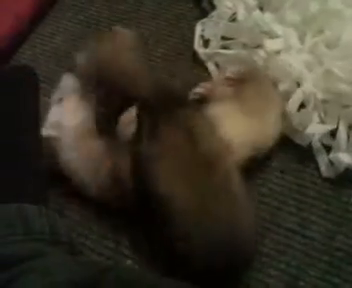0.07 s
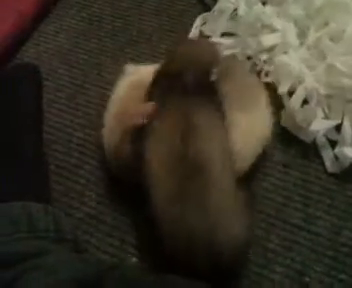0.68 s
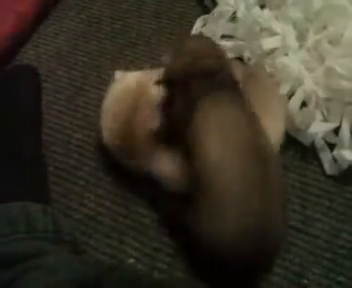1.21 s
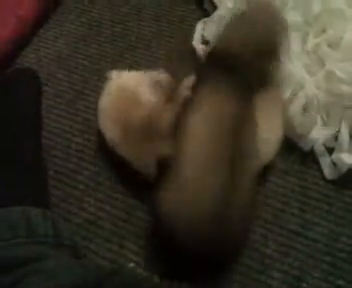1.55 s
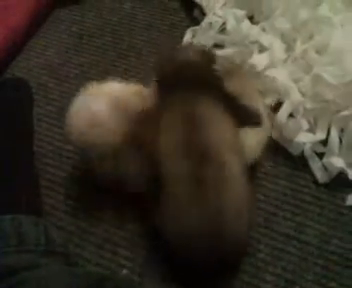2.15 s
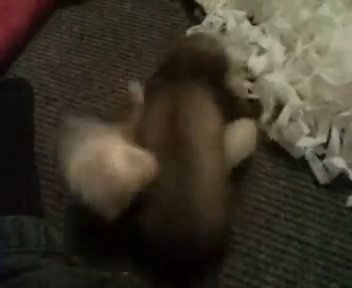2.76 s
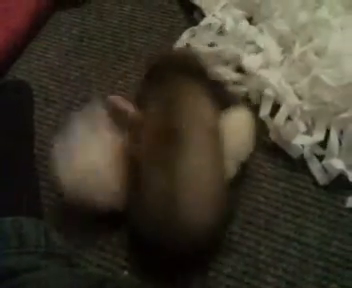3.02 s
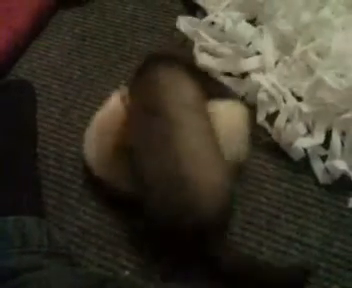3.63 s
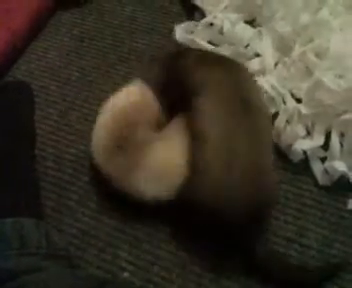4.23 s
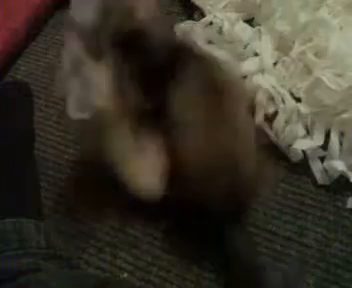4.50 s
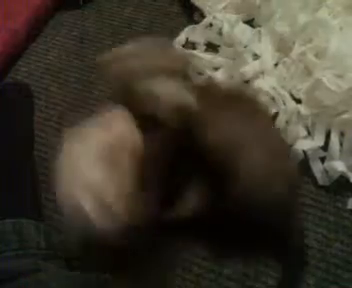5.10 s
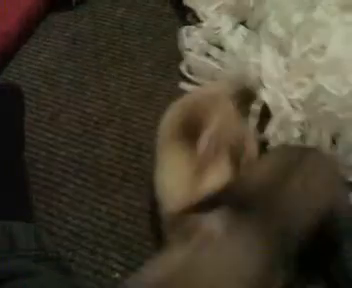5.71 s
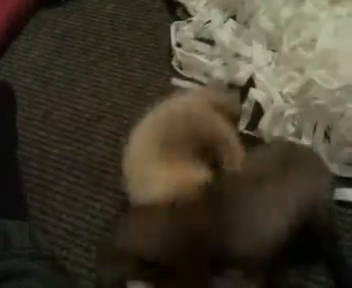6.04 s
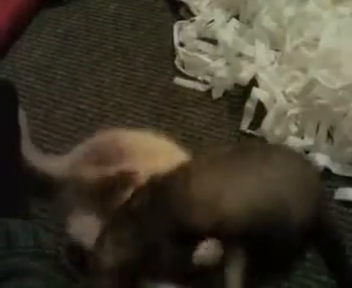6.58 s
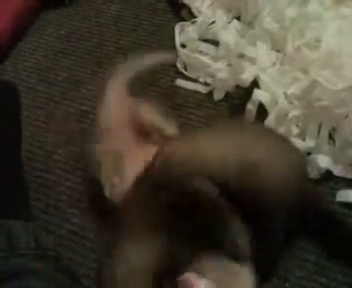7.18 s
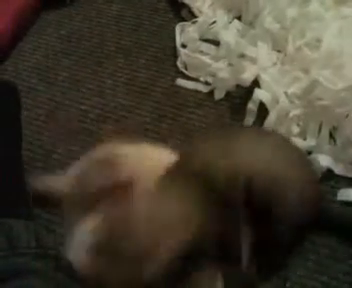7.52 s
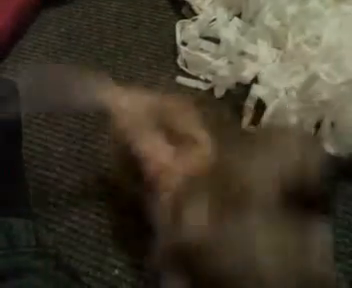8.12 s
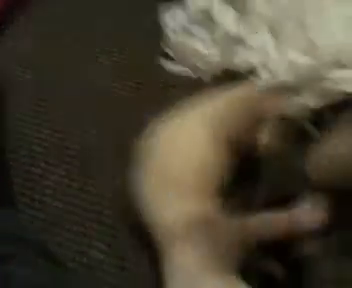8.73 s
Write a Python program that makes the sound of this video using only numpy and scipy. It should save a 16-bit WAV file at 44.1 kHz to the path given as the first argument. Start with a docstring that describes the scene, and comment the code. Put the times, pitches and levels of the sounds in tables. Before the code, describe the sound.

A low motor hum slowly swells and fades throughout in a small, quiet room, with soft hiss and a faint, thin whine from the close microphone. Ferrets play on the carpet: a tiny squeak and faint crinkles of shredded paper come just before 1 second, then soft fur rubs until about 1.6. One ferret gives short, hoarse clucks at about 2.2, 2.8, 3.1 and 3.7 seconds, and a body lands with a dull floorboard thud at 2.7. Faint squeaks follow around 4 seconds, then light claw scratches and paper rustle near 4.5. The loudest thud comes at 5 seconds. Paper stirs at 5.7, a claw catches the carpet near 6, and another thud lands at 6.4. Light scuffs and tiny squeaks continue between 7 and 8 seconds. Two sharper bumps arrive at 8.3 and 8.5, ending with a small scratch and paper crackle.

```python
"""A low motor hum and a soft hiss fill a small, quiet room; then ferrets start to wrestle on the carpet.
Fur rubs and claws scratch the pile, shredded paper stirs, and there are a few tiny squeaks.
One ferret gives short, hoarse clucks as pulses of its voice ring its throat and mouth.
Bodies land and make the floorboards thud. All along, the hum slowly swells and fades,
and a small camera close by adds the hiss and a thin whine."""
import sys
import numpy as np
from scipy import signal
from scipy.fft import rfft, irfft, next_fast_len
from scipy.io import wavfile
from scipy.ndimage import uniform_filter1d, map_coordinates

SR = 44100
rng = np.random.default_rng(int(sys.argv[2]) if len(sys.argv) > 2 else 0)


def pcm_store(signal):
    """Save signal as 16-bit PCM."""
    levels = np.round(np.clip(np.atleast_2d(signal), -1, 1) * 32767)
    wavfile.write(sys.argv[1], SR, levels.astype(np.int16).T)


N = 385875


def amp(db):
    """Turn decibels into a number to multiply by."""
    return 10 ** (np.asarray(db) / 20)


def unit(x):
    """Scale a sound to an average (rms) strength of 1."""
    return x / np.sqrt(np.mean(x ** 2) + 1e-20)


def clock():
    """The time of every sample, in seconds."""
    return np.arange(N) / SR


def along(points, hz):
    """Read between the rows of a (pitch_hz, value) table, on a musical (log) scale."""
    pitches, values = np.transpose(points)
    return np.interp(np.log(hz + 1), np.log(pitches + 1), values)


def wobble(per_s):
    """A smooth curve through per_s random points a second."""
    return map_coordinates(rng.standard_normal(int(N * per_s / SR) + 4), [clock() * per_s])


def filtered(x, response):
    """Turn each frequency up or down by response(hz)."""
    size = next_fast_len(len(x) + SR // 4)
    return irfft(rfft(x, size) * response(np.fft.rfftfreq(size, 1 / SR)), size)[:len(x)]


def coloured(x, spectrum):
    """Shape a sound's tone with a (pitch_hz, level_db) table, at strength 1."""
    return unit(filtered(x, lambda hz: amp(along(spectrum, hz))))


def fibres(spectrum, spiky_db):
    """Countless tiny snaps of uneven size."""
    return coloured(rng.standard_normal(N) * amp(spiky_db * rng.standard_normal(N)), spectrum)


def stroke(middle_s, length_s):
    """A smooth swell that peaks at middle_s."""
    return np.exp(-2 * np.minimum(((clock() - middle_s) / length_s) ** 2, 20))


def blend(a, b, share):
    """Mix by power: share of b, the rest a."""
    share = np.clip(share, 0, 1)
    return np.sqrt(1 - share) * a + np.sqrt(share) * b


def air_and_hiss(air_db=-64.2, hiss_db=-66.7, unrest_db=.8, drift_db=.5):
    """The room's dull, gently drifting rush and the camera's even hiss."""
    # tone of the quiet room: pitch_hz, level_db
    air_tone = [(20, -10), (55, -.5), (75, -7), (130, -9), (200, -18), (270, -16), (340, -10), (480, -16),
                (800, -21), (1500, -17.3), (2200, -29), (4000, -53.5)]
    # tone of the camera's hiss: pitch_hz, level_db
    hiss_tone = [(500, -6), (2100, 0), (2600, 1), (3200, 0), (3800, -5), (4500, -1.5), (5000, -2),
                 (5600, -6), (6200, -5.5), (6700, -6), (7200, -9.5), (7600, -19.5)]
    air_level = amp(air_db + unrest_db * wobble(15) + drift_db * wobble(1.2))
    air = air_level * coloured(rng.standard_normal(N), air_tone)
    return air + amp(hiss_db) * coloured(rng.standard_normal(N), hiss_tone)


def camera_whine(tick_hz=292.95, stray_hz=2460, stray_db=-78, smear=0.0687):
    """The electronics make fast, even, smeared ticks that merge into a whine, beside one stray tone."""
    # overtones of the ticking: multiple of tick_hz, level_db
    overtones = [(9, -73), (10, -80), (12, -79.5), (13, -84), (14, -82.5), (15, -75.5), (16, -79),
                 (17, -74.5), (18, -76), (20, -78), (21, -83), (23, -80.5), (24, -94), (25, -89.5)]
    t = clock()
    ticks = sum(amp(db) * np.cos(2 * np.pi * round(k) * tick_hz * t - smear * k * k)
                for k, db in overtones)
    return np.sqrt(2) * (ticks + amp(stray_db) * np.sin(2 * np.pi * stray_hz * t))


def motor_hum(motor_hz=98.475, mains_hz=100.175, motor_db=-63.5, mains_db=-68, unrest_db=1):
    """A distant motor runs just behind the mains power, so their two tones swell and fade together."""
    t = clock() - .083  # the first swell peaks near this time
    # motor_hz is twice the shaft's speed; mains_hz is twice the power's frequency
    phase = 2 * np.pi * motor_hz * t + .12 * wobble(1.5)
    motor = amp(motor_db + unrest_db * wobble(3.4)) * np.sin(phase)
    shaft_overtones = amp(-76) * np.sin(2 * phase) + amp(-79) * np.sin(5 / 2 * phase)
    mains = amp(mains_db) * np.sin(2 * np.pi * mains_hz * t)
    return np.sqrt(2) * (motor + shaft_overtones + mains)


def room(x, echo_db=-14, ring_db=-3, ring_delay_s=.023):
    """The walls add a short wash of echoes, and the furniture rings a moment later."""
    # how long the wall echoes last: pitch_hz, fade_s (time to drop 60 dB)
    walls = [(150, 0.5), (700, .25), (1100, 0.43), (3000, 0.17), (7000, 0.0065)]
    # notes the furniture rings at: pitch_hz, width_hz, level_db
    furniture = [(362, 23, -3), (700, 68, -17.5), (910, 52, -7.5), (1026, 9.2, 2.5), (1094, 22, -1),
                 (1235, 80, 5.5), (1746, 25, 3.5)]
    hz, t, noise = signal.stft(rng.standard_normal(SR // 2), SR, nperseg=256)
    tail = signal.istft(noise * amp(-60 * t / along(walls, hz)[:, None]), SR, nperseg=256)[1]
    echoes = signal.fftconvolve(x, np.pad(tail, (SR // 200, 0)) / np.linalg.norm(tail))[:N]
    rings = lambda f: sum(amp(db) * 1j * f * width / (pitch * pitch - f * f + 1j * f * width)
                          for pitch, width, db in furniture)
    ringing = filtered(x, lambda f: rings(f) * np.exp(-2j * np.pi * f * ring_delay_s))
    return x + amp(echo_db) * echoes + amp(ring_db) * ringing


def squeaks_and_tick(waver=0.012, flutter_db=2):
    """Faint, thin tones that flutter a little in pitch and strength."""
    # tiny squeaks and whimpers, and one high, thin tick of paper: middle_s, level_db, length_s, pitch_hz
    notes = [(0.617, -64.5, 0.04, 2460), (.774, -73, 0.025, 3140), (1.992, -68.5, .022, 3140),
             (3.957, -69, 0.059, 2440), (4.093, -74, .032, 3200), (4.106, -71.5, 0.045, 2434),
             (2.9, -65.5, .012, 6480), (6.06, -67, 0.027, 3400), (7.598, -66, 0.0097, 790),
             (7.608, -69, 0.036, 2430), (7.73, -70, 0.037, 2470), (7.75, -74.5, 0.025, 3420),
             (7.768, -71, 0.021, 780)]
    bent_time = np.cumsum(1 + waver * wobble(200)) / SR
    flat_swell = lambda s, length: np.minimum(2 * stroke(s, length), 1)
    tones = sum(amp(db) * flat_swell(s, length) * np.sqrt(2) * np.sin(2 * np.pi * hz * bent_time)
                for s, db, length, hz in notes)
    return tones * amp(flutter_db * wobble(70))


def paper_crinkles():
    """Strips of shredded paper crackle when nudged."""
    # nudges to the paper: middle_s, level_db, length_s
    nudges = [(.72, -73, .04), (.857, -69.5, .064), (1.35, -77, .052), (1.55, -74, .08),
              (2.896, -67, .0094), (4.53, -65, .08), (4.68, -67, .13), (5.68, -62.5, .18), (6.05, -64, .08),
              (8.67, -62.5, .22)]
    # tone of the crackle: pitch_hz, level_db
    paper_tone = [(1000, -4.5), (2500, -4), (3300, -7), (4000, -11), (5600, -9.5), (6500, -13.5),
                  (7000, -10.5), (7500, -41)]
    swells = sum(amp(db) * stroke(s, length) for s, db, length in nudges)
    return swells * fibres(paper_tone, spiky_db=12.0)


def carpet_scuffs(catch_db=3, catches_per_s=140):
    """Fur rubs the pile dully and claws scratch it, catching and slipping."""
    # paws and sides brushing the carpet: middle_s, level_db, length_s, claw_share (0-1)
    brushes = [(1.04, -64, .07, .01), (1.117, -62, .034, .01), (1.172, -62, .03, 0), (1.493, -61, .035, .1),
               (1.57, -58, .047, .04), (4.294, -69, .033, 0), (4.46, -69, .04, .5), (4.512, -62, .04, .55),
               (5.073, -59.5, .035, .6), (6.04, -59.5, .06, .2), (6.068, -55.5, .014, .1),
               (7.148, -59, .024, .08), (7.275, -58.5, .045, .25), (6.43, -59.5, .036, .55),
               (7.594, -61.5, .038, .6), (7.717, -67, .11, .7), (8.348, -54, .015, .1),
               (8.625, -59.5, .04, .15), (8.685, -64, .07, .6)]
    # tone of the soft rub: pitch_hz, level_db
    rub_tone = [(100, -5.5), (220, -5.5), (340, -0.5), (520, -10), (800, -23.5), (1400, -19), (3000, -13.5),
                (7000, -63)]
    # tone of the scratch: pitch_hz, level_db
    scratch_tone = [(200, -12), (340, -4), (480, -2), (620, -5), (800, 0), (1000, -3), (1350, 1.5),
                    (1900, -7), (2700, -17), (3300, -16), (4200, -24), (7000, -28)]
    rub, scratch = fibres(rub_tone, spiky_db=3.5), fibres(scratch_tone, spiky_db=4.0)
    slips = unit(amp(catch_db * wobble(catches_per_s)))
    return slips * sum(amp(db) * stroke(s, length) * blend(rub, scratch, claw_share)
                       for s, db, length, claw_share in brushes)


def claw_snags(fade_s=0.03, width_octaves=.45):
    """A claw catches a loop of the pile and lets go with a small dry tick."""
    # loops snapping free: start_s, level_db, pitch_hz
    snags = [(.614, -61, 1100), (3.362, -58, 1500), (3.379, -59, 1450), (4.504, -59, 1600),
             (6.064, -49, 520), (7.264, -55, 600), (7.996, -51, 1350), (8.618, -52.5, 2700)]
    t = np.arange(SR // 20) / SR
    out = np.zeros(N)
    for start_s, db, pitch_hz in snags:
        band = lambda hz: 1 / (1 + (np.log2((hz + 1) / pitch_hz) / width_octaves) ** 4)
        snap = unit(filtered(rng.standard_normal(len(t)), band))
        out += np.interp(clock(), t + start_s, snap * amp(db - 60 * t / fade_s), 0, 0)
    return out


def body_bumps(rise_share=0.2):
    """A soft body pushes the floorboards down; a shorter push gives a sharper, brighter thud."""
    # bodies landing: time_s, peak_db, contact_s
    landings = [(2.731, -34.5, 0.0058), (5.0524, -28.5, 0.0077), (5.174, -52, 0.007),
                (6.390, -36.5, 0.0063), (7.483, -57, 0.0067), (8.336, -34.5, 0.002), (8.349, -46, 0.0016),
                (8.508, -43.5, 0.0014)]
    # notes of the boards under the carpet: pitch_hz, level_db, fade_s (time to drop 60 dB)
    board_notes = [(56, -7.5, 0.63), (103, 12.5, 0.11), (154, 0.5, 0.14), (197, -0.5, 0.08),
                   (333, -22, .054)]
    t = np.arange(SR // 2) / SR
    boards = -sum(amp(db - 60 * t / fade_s) * np.sin(2 * np.pi * hz * t)
                  for hz, db, fade_s in board_notes)
    out = np.zeros(N)
    for time_s, db, contact_s in landings:
        push = np.sin(np.pi * np.minimum(t / contact_s, 1)) ** 2
        rise = 1 - np.exp(-t / (rise_share * contact_s))
        thud = signal.fftconvolve(boards * rise, push)[:len(t)]
        out += amp(db) * np.interp(clock(), t + time_s - contact_s / 4, thud / np.abs(thud).max(), 0, 0)
    return out


def cluck(start_s, level_db, swell_db, length_s, start_hz, end_hz, opening, open_s, roughness, mouth_hz,
          mouth_db=5, mouth_width_hz=200, shut_hz=450, closing_s=0.012,
          jitter=0.026, rise_s=0.0022, release_s=0.016):
    """Uneven voice pulses and rasp ring the throat and mouth; a shut mouth lets only the lows out."""
    # tone of the open throat: pitch_hz, level_db
    throat_tone = [(200, -27), (350, -10), (520, -12), (700, 0.5), (1000, -3.5), (1300, -6.5), (1700, -9),
                   (2200, -21.5), (2700, -22.5), (3100, -14), (3700, -33), (6500, -33), (7500, -42)]
    t = np.arange(SR // 8) / SR
    progress = np.minimum(t / length_s, 1)
    pitch = start_hz + (end_hz - start_hz) * progress
    waver = unit(uniform_filter1d(rng.standard_normal(len(t)), size=120))
    phase = 2 * np.pi * np.cumsum(pitch * (1 + jitter * waver)) / SR
    pulses = sum(np.cos(k * phase - k * k / 2) for k in np.arange(1, 20))
    rasp = rng.standard_normal(len(t)) * (1 + np.cos(phase))
    throat = blend(coloured(pulses, throat_tone), coloured(rasp, throat_tone), roughness)
    mouth_ring = lambda hz: amp(mouth_db / (1 + ((hz - mouth_hz) / mouth_width_hz) ** 2))
    open_voice = unit(filtered(throat, mouth_ring))
    shut_voice = unit(filtered(open_voice, lambda hz: 1 / (1 + (hz / shut_hz) ** 6)))
    openness = np.clip(opening, 0, 1) * np.clip(1 - (t - open_s) / closing_s, 0, 1)
    voice = openness * open_voice + (1 - openness) * shut_voice
    fade = np.minimum(t / rise_s, 1) * np.clip(1 - (t - length_s) / release_s, 0, 1) ** 2
    loudness = amp(level_db + swell_db * progress) * fade
    return np.interp(clock(), t + start_s, loudness * voice, 0, 0)


def ferret_clucks():
    """One ferret gives a few short, hoarse clucks."""
    # the clucks: start_s, level_db, swell_db, length_s, start_hz, end_hz,
    # mouth opening (0-1), open_s (until the mouth starts to shut), roughness (0-1), mouth_hz
    calls = [(2.241, -43, -5.5, 0.017, 378, 359, 1, 0.036, 0.6, 780),
             (2.261, -40.5, 2.5, 0.015, 361, 343.3, 1, 0.013, 0.45, 1160),
             (2.823, -41.5, 1.5, 0.037, 317.2, 376.6, 0.9, .02, 0.14, 936),
             (2.904, -48.5, 0, .007, 377, 386, 0.6, 0.011, 0.6, 1500),
             (3.121, -45, -10, 0.031, 237.6, 308, 0.33, 0.014, 0.37, 750),
             (3.657, -47.5, -13, 0.047, 258.6, 250, 0.56, 0.03, 0.46, 1150)]
    return sum(cluck(*row) for row in calls)


def scene():
    """The ferrets play in the room, over the steady background."""
    play = ferret_clucks() + carpet_scuffs() + paper_crinkles() + claw_snags() + squeaks_and_tick()
    return (room(play) + body_bumps() + motor_hum() + camera_whine() + air_and_hiss())[None]


def record(dry):
    """The camera cuts off the highest treble and shifts the whole wave slightly above zero."""
    top_hz, offset = 7550, .019
    return filtered(dry[0], lambda hz: 1 / np.sqrt(1 + (hz / top_hz) ** 160))[None] + offset


dry = scene()
out = record(dry)
pcm_store(out)
```